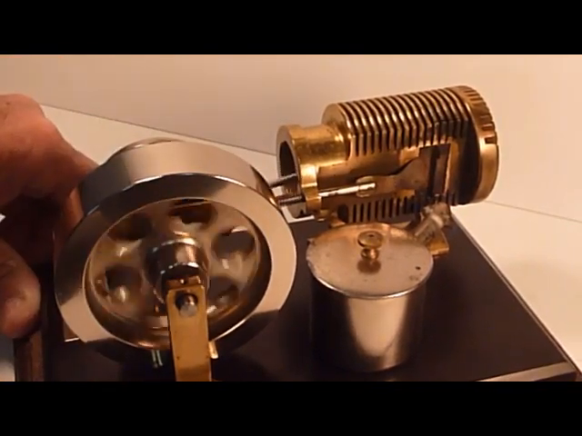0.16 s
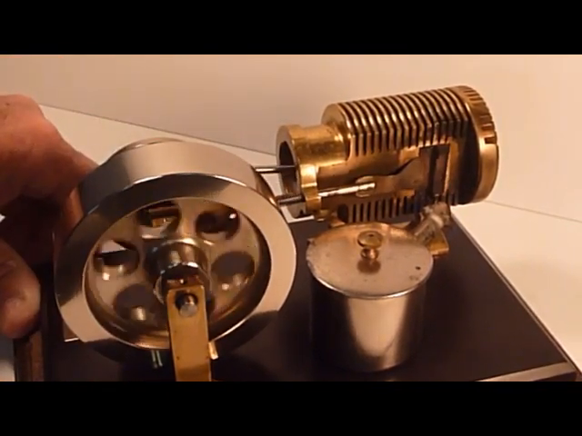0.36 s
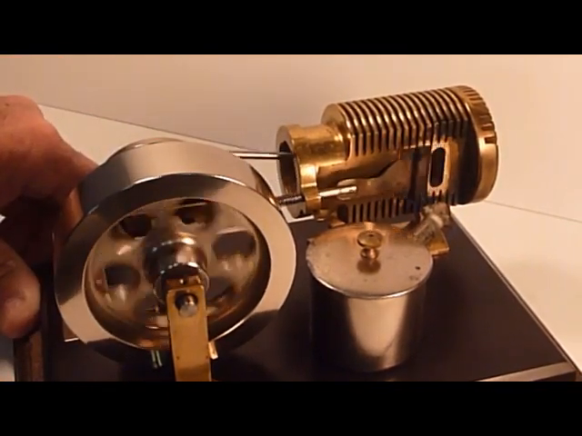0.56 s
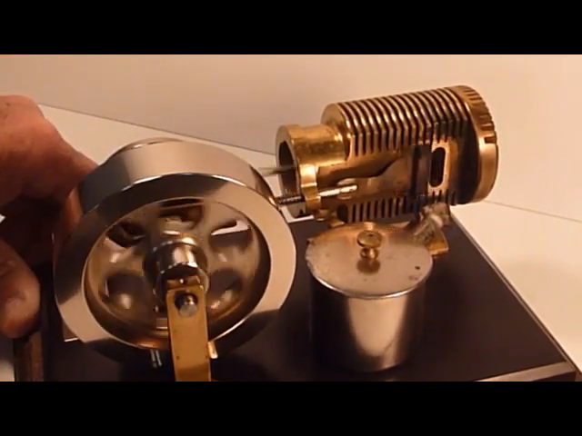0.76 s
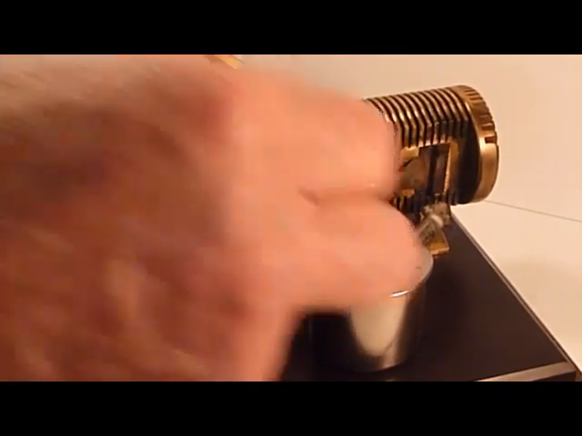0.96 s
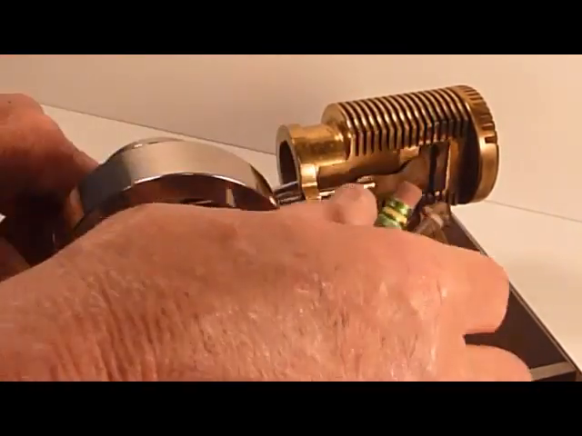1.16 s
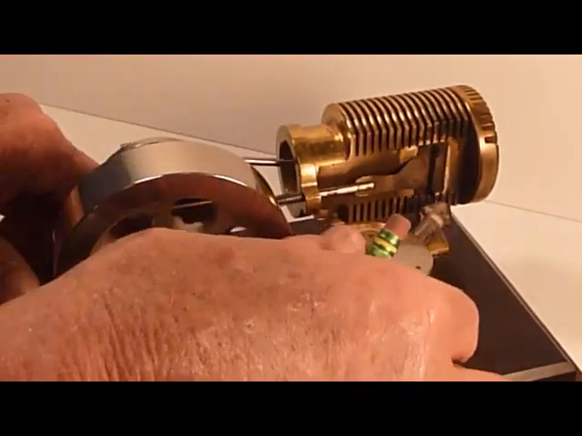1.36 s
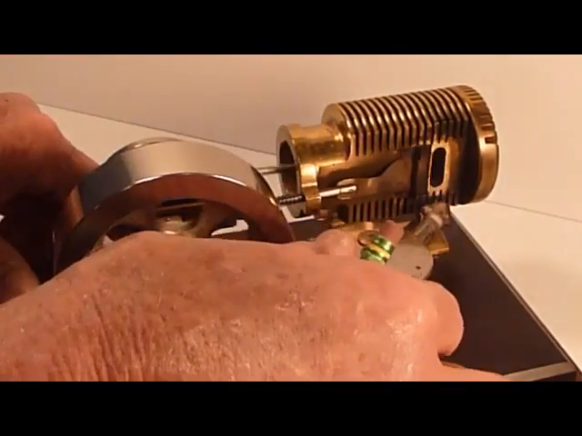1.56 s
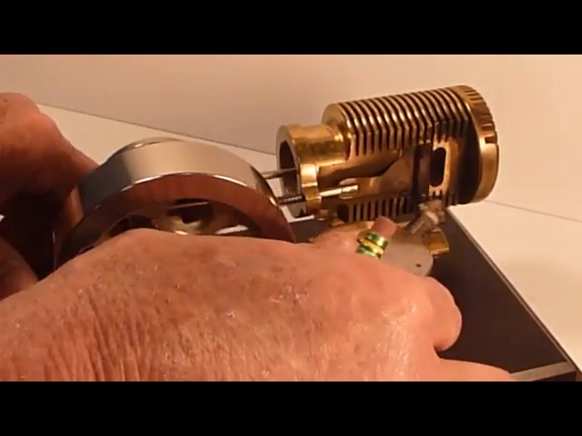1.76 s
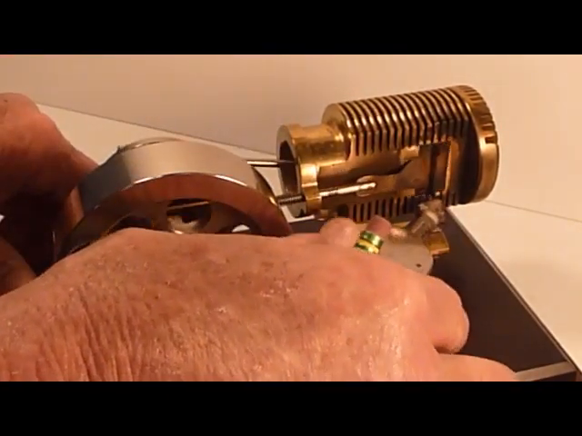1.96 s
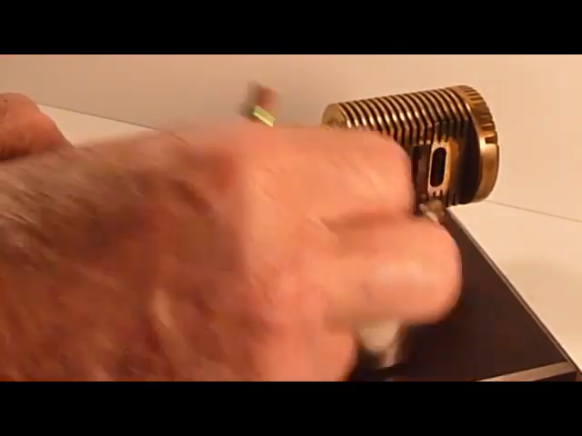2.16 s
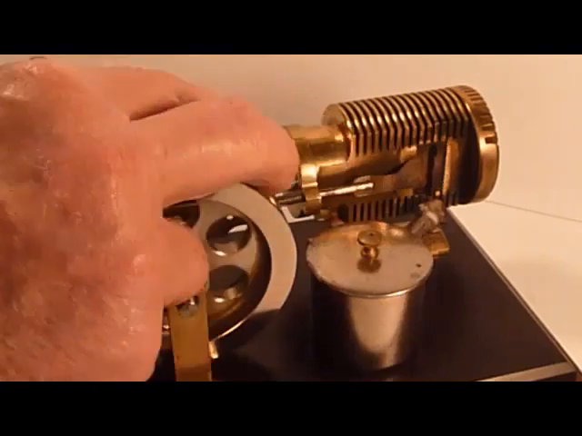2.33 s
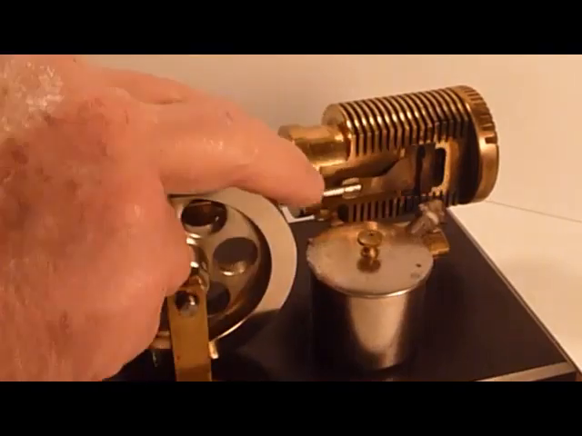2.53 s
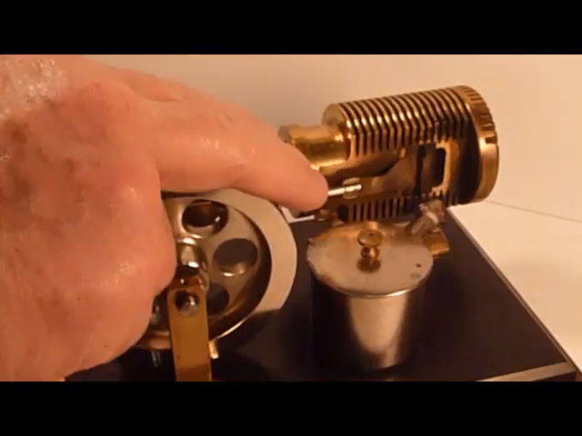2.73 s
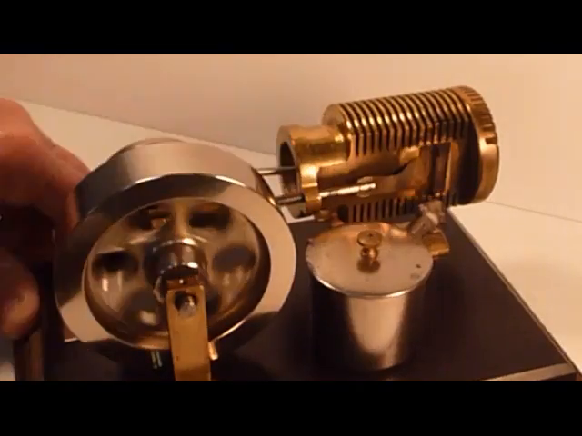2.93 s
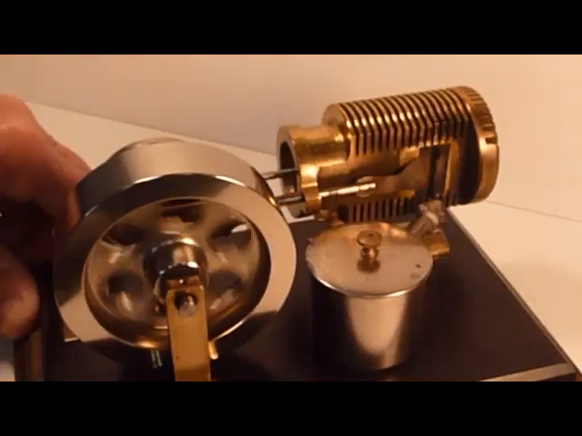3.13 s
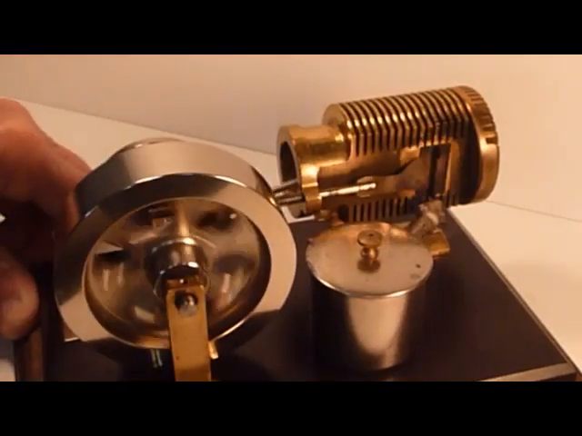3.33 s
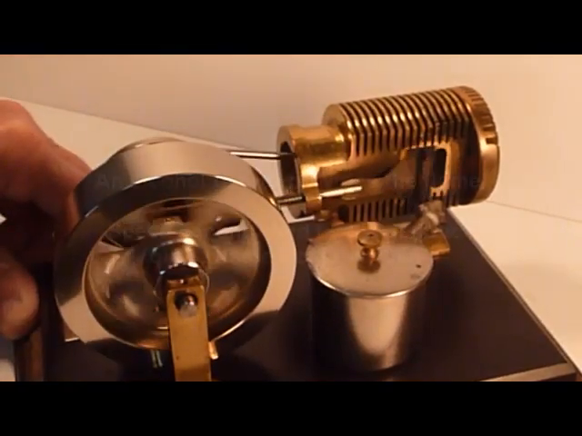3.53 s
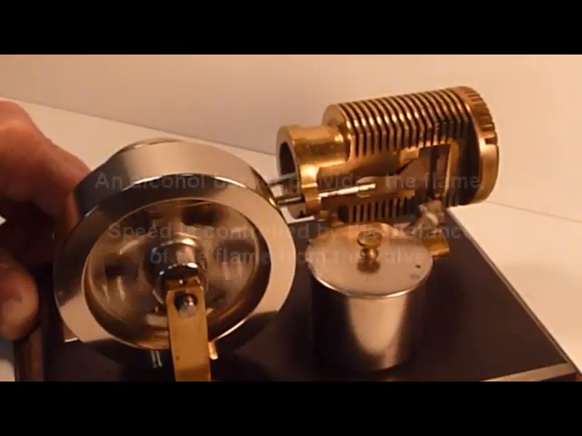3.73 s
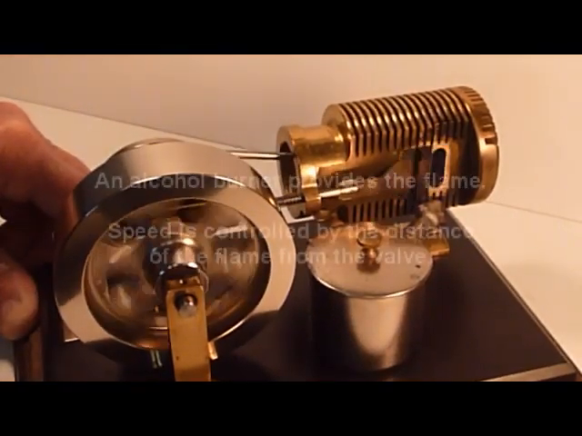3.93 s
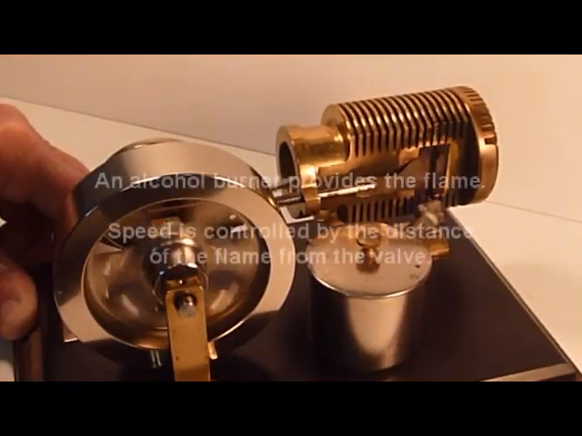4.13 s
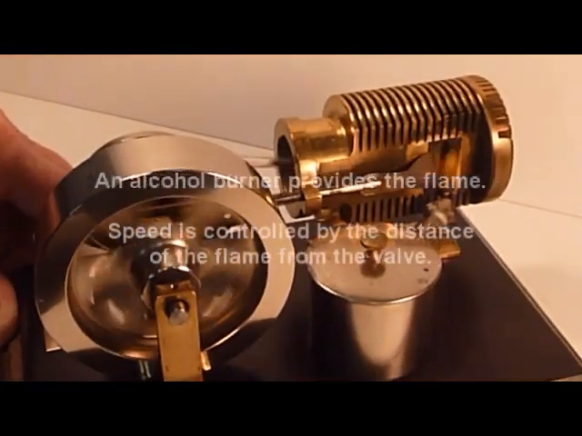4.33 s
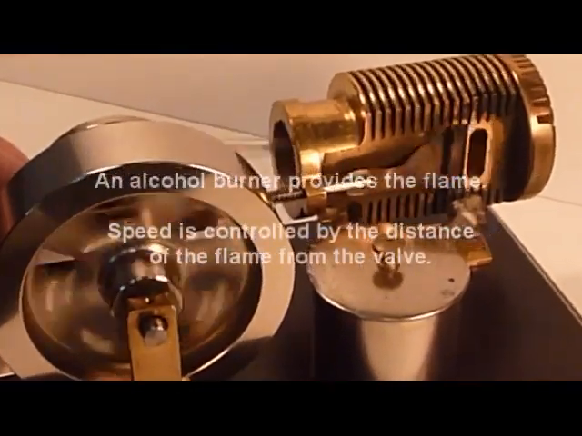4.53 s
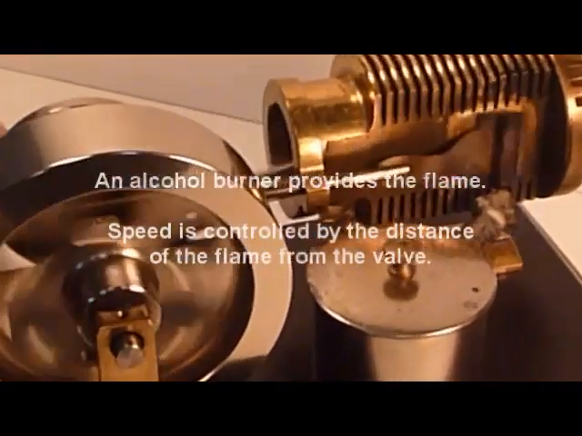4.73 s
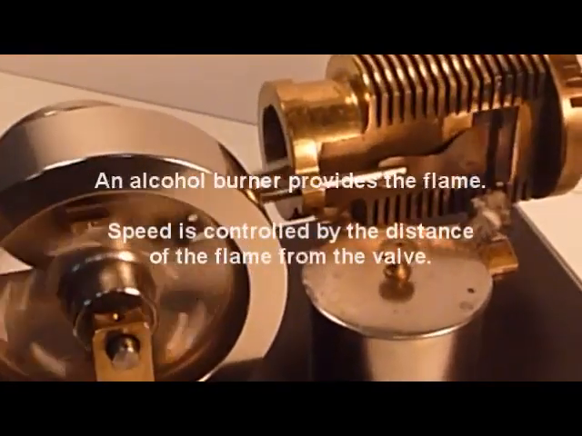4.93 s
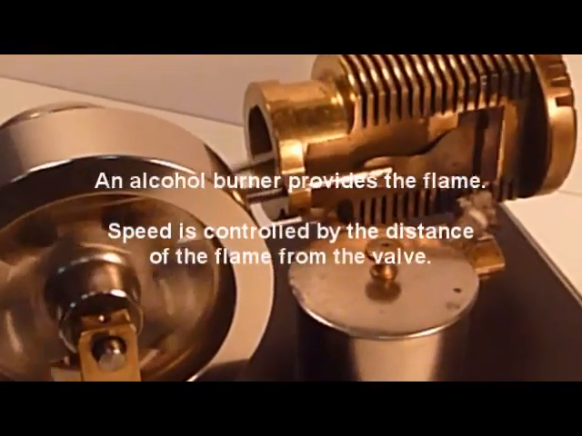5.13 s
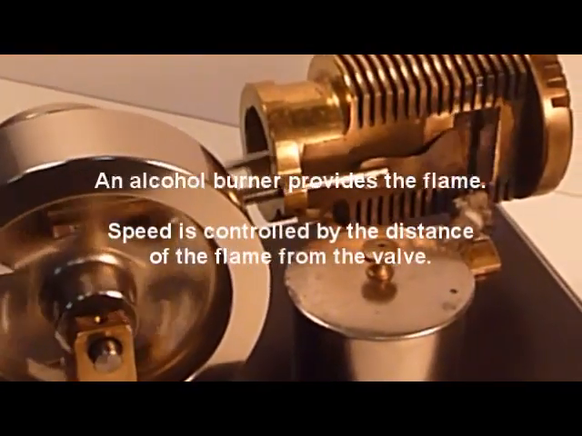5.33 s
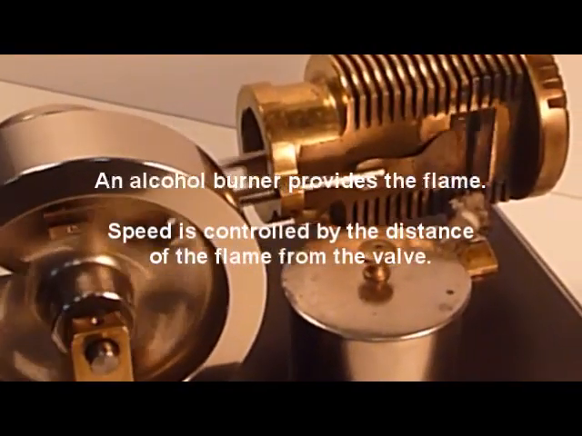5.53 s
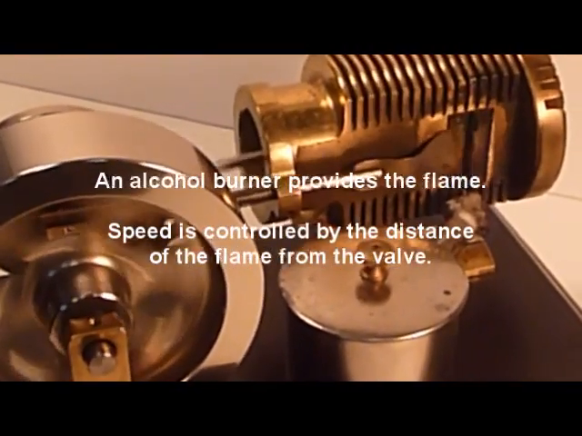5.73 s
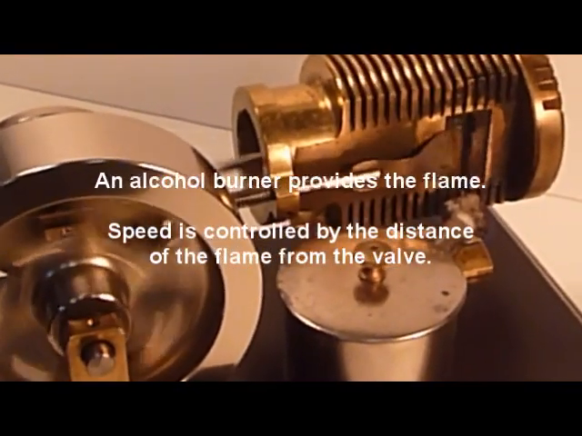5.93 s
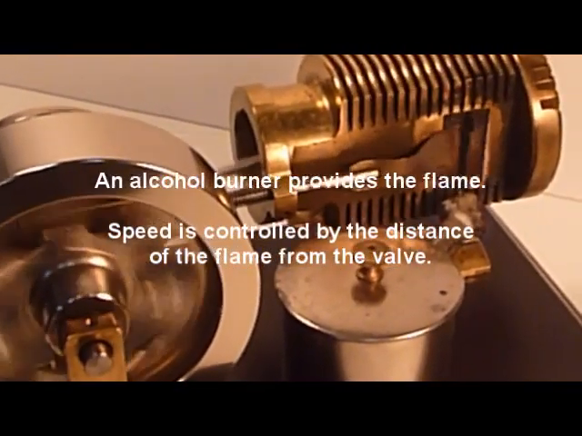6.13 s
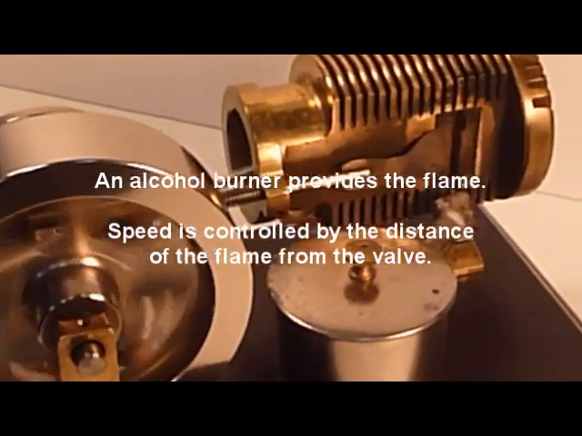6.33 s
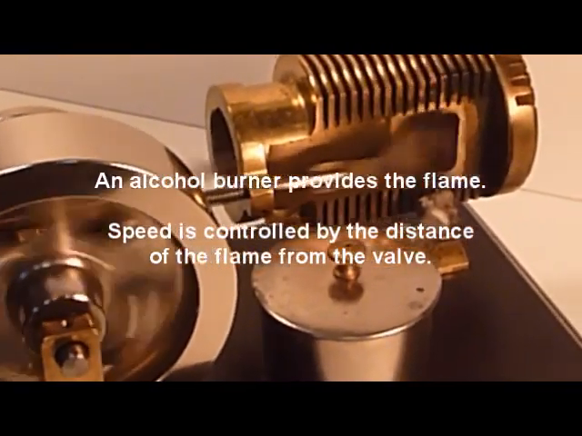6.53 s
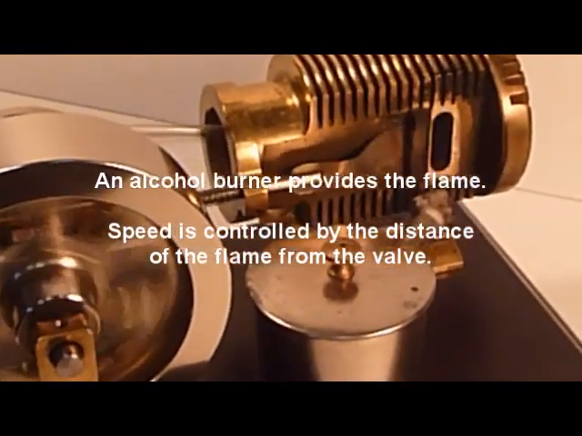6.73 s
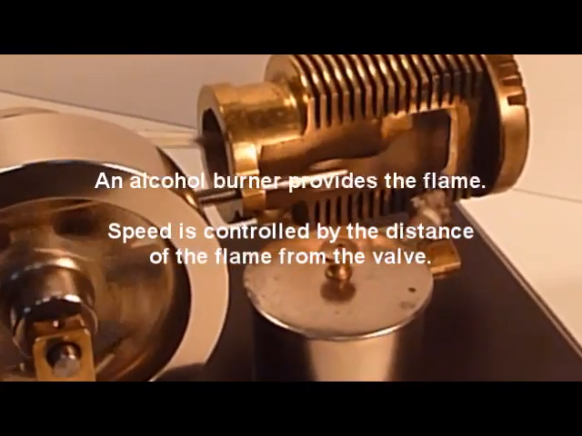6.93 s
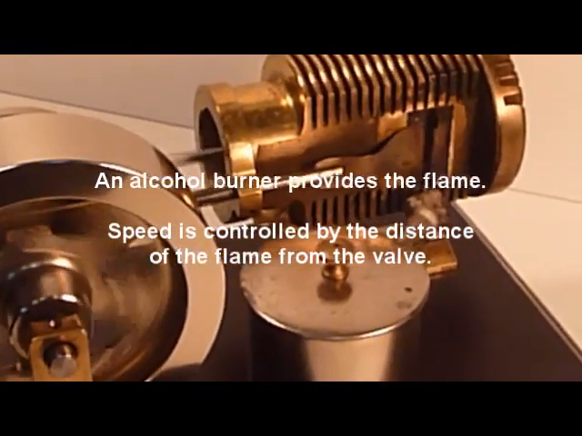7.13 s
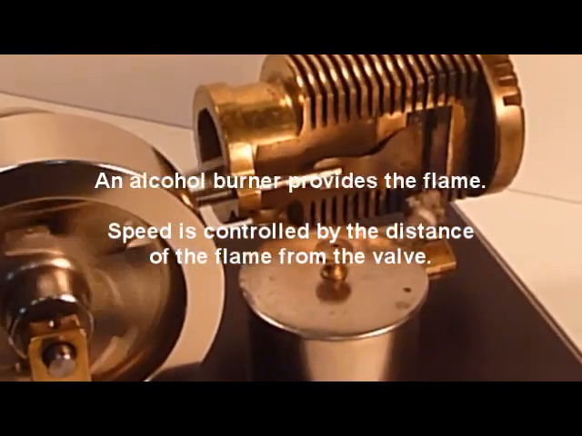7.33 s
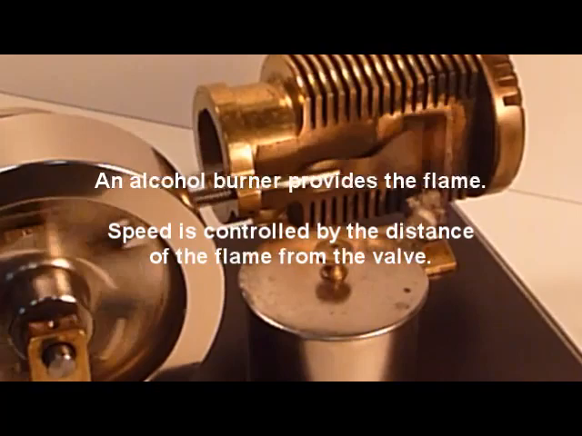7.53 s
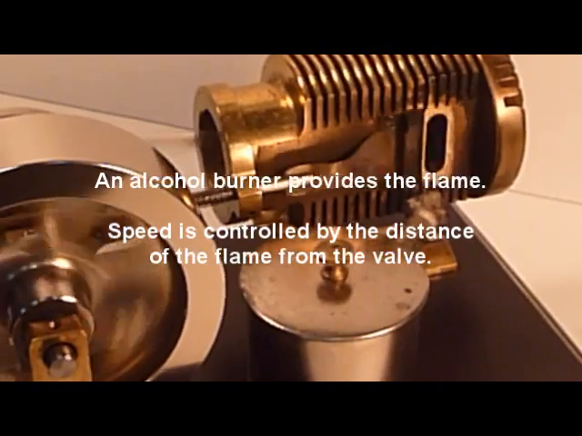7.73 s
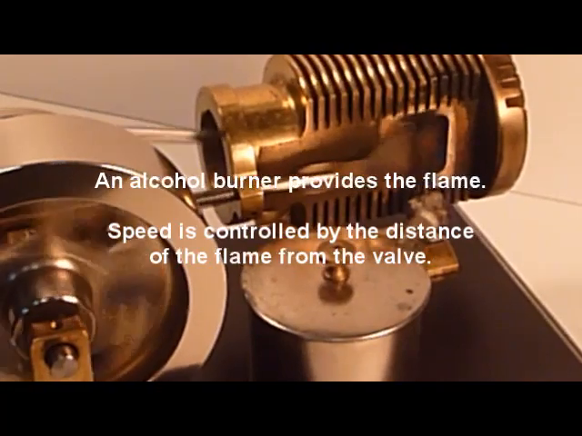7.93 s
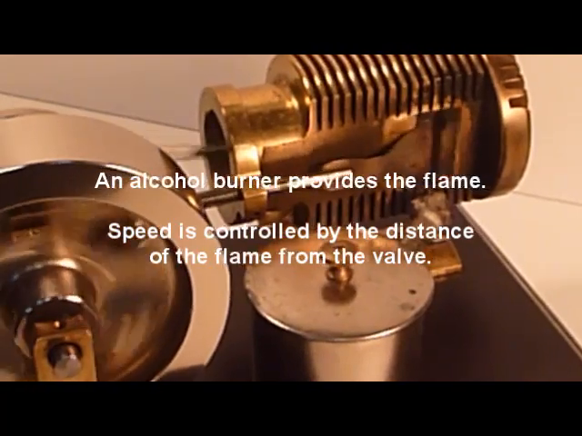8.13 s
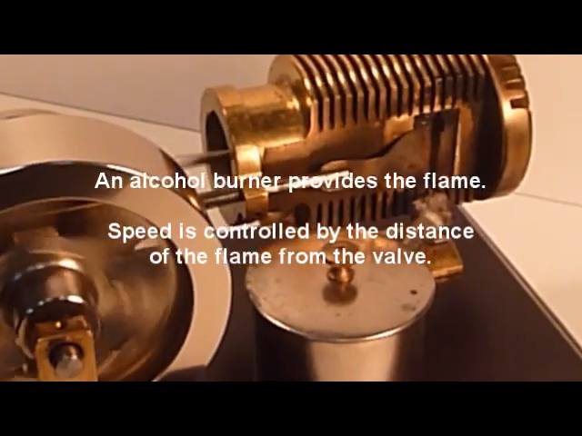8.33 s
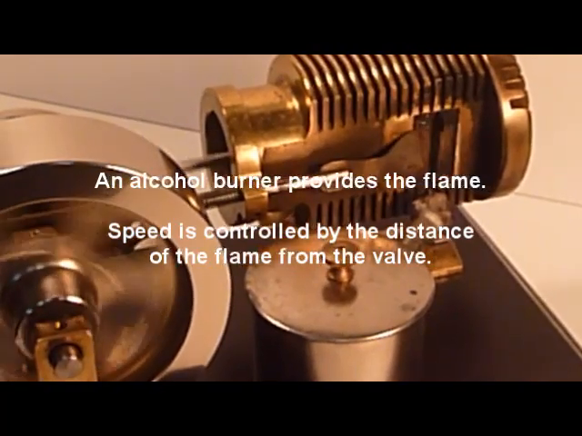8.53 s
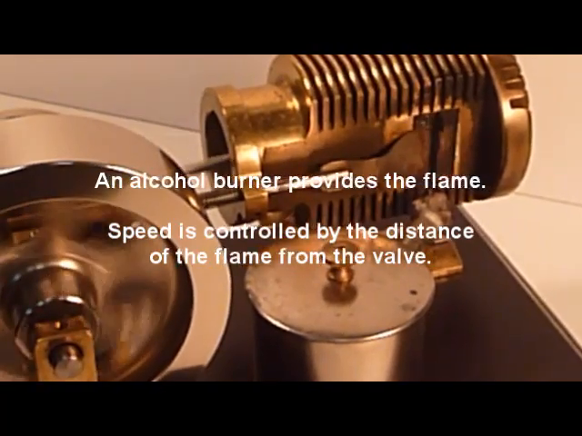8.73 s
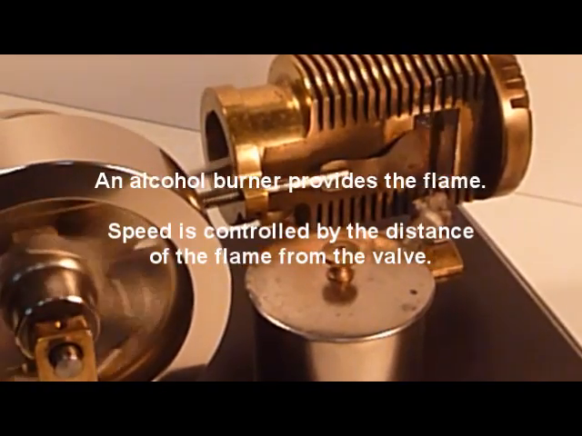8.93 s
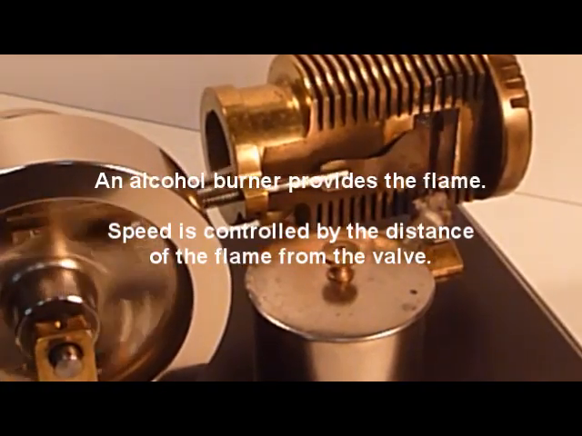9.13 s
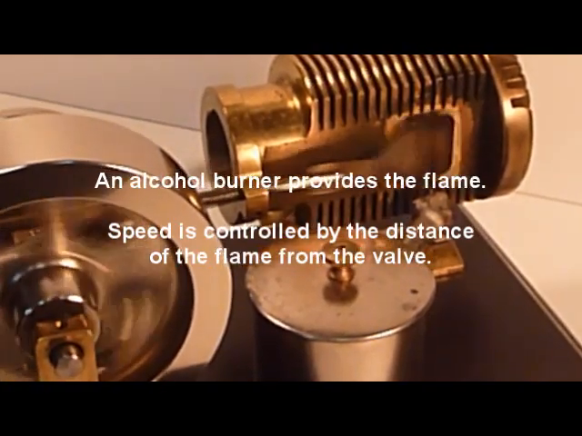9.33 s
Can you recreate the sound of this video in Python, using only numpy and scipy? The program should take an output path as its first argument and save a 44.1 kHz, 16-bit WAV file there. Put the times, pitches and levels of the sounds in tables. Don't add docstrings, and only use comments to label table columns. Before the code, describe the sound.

Dull wooden thuds and metal ticks beside a brass model engine, a couple of starting pops, then fast regular clacking pops with chirpy valve ticks.

```python
import sys
import numpy as np
from scipy import signal
from scipy.fft import rfft, irfft, next_fast_len
from scipy.io import wavfile
from scipy.ndimage import map_coordinates

SR = 44100
rng = np.random.default_rng(int(sys.argv[2]) if len(sys.argv) > 2 else 0)


def volts_from_db(level):
    exponent = np.asarray(level, float) / 20
    return 10 ** exponent


def wav_record(signal):
    frames = np.transpose(np.atleast_2d(signal))
    bounded = np.clip(frames, -1, 1)
    quanta = np.round(bounded * 32767).astype(np.int16)
    wavfile.write(sys.argv[1], SR, quanta)


N = 418068

# time in seconds, speed in turns per second.
FLYWHEEL_SPEED = [(3.47, 6.736), (3.65, 7.556), (3.8, 7.156), (4.2, 7.872), (5.05, 9.51), (5.7, 9.953),
                  (5.9, 9.965), (6.55, 10.855), (7.6, 10.994), (8.1, 10.844), (8.5, 10.244), (9.05, 10.292),
                  (9.48, 11.077)]
FIRST_POP_S = 3.4722

# start in seconds, peak in dB, crack in dB, lean of the port modes in dB per 100
# Hz.
HAND_POPS = [
    (0.326, -1, -25.5, -2),
    (3.138, -3, -25.5, -3.05),
    (3.318, -1, -22.5, 0.65),
]
POP_DB, POP_DB_PER_S, POP_SCATTER_DB = -.8, -.65, .7
CRACK_DB, CRACK_DB_PER_S, CRACK_SCATTER_DB = -20.5, -2, 2.5
LEAN, LEAN_SCATTER = 0.14, .03

# pitch in Hz, level in dB, decay t60 in seconds, polarity, left over right in dB.
BODY_MODES = [(250, -11, .018, -1, 0), (396, -21, .036, 1, 1), (486, -19, .042, 1, -2),
              (672, -6, .022, 1, 0), (800, -19, .03, 1, 0), (1003, -23, .021, -1, -9),
              (1163, -14, .025, 1, 0), (1311, -15, .026, 1, -4), (1460, -17, .033, 1, -5),
              (1730, -18, .03, 1, -7), (1886, -6, .019, -1, -4), (2125, -14, .021, 1, -6),
              (2303, -20, .024, 1, 1), (2498, -30, .038, -1, -6), (2764, -24, .02, -1, 1)]
# time in seconds, port ring in Hz, top of the whistle in Hz, cylinder level in dB.
PORT_OPENING = [(.33, 1867, 2100, -17), (3.14, 2035, 2220, -10), (3.32, 1890, 2590, -7),
                (3.8, 1902, 2453, -7), (4.5, 1860, 2770, -4), (5.5, 1891, 2922, -1), (9.48, 1848, 3000, -1)]
# share of the whistle top, level in dB.
RUSH_TONE = [(.15, -21), (.28, -8), (.4, -6), (.62, 3.5), (.86, 8), (.97, 0.5), (1.1, -39)]
# share of the whistle top, level in dB.
STROKE_TONE = [(.12, -21.5), (.25, -10), (.4, -13), (.6, -6), (.75, 2.5), (.92, 5), (.99, -5),
               (1.08, -32.5)]
# frequency in Hz, level in dB.
CRACK_TONE = [(2500, -37), (3050, -4), (3500, 5), (4500, -4.5), (6500, -17), (8000, -31), (9500, -25),
              (16000, -41.5)]
# frequency in Hz, level in dB.
SNAP_TONE = [(6000, -30.5), (8000, -8.5), (10000, 0), (13000, -2), (16000, 4)]
SNAP_DB, SNAP_SCATTER_DB = -34, 4
# frequency in Hz, level in dB.
CONTACT_TONE = [(1500, -1.5), (2500, 1), (5000, 3), (7000, -3.5), (8000, -15), (9500, -0.5), (11000, -15),
                (13000, -32.5)]
TABLE_HZ, TABLE_WIDTH_HZ, TABLE_DEPTH = 930, 110, .8

# pitch in Hz, level in dB, decay t60 in seconds.
VALVE_MODES = [(3320, -6, .045), (3390, -5.5, .055), (3460, -5.5, .05), (3560, -4, .02), (3200, -6, .014),
               (4250, -14, .02), (5800, -20, .012), (9050, -20, .012)]
# time in seconds, pitch ratio.
VALVE_TIGHTNESS = [(3.5, 0.91), (4.6, 0.95), (5.2, 1), (9.48, 1.01)]
# time in seconds, level in dB.
SEATING_LEVEL = [(3.55, -31), (3.82, -32.5), (4.2, -25), (4.6, -23.5), (5.15, -19.5), (5.55, -20),
                 (5.8, -26), (6.05, -22.5), (6.5, -21.5), (7.2, -24), (7.65, -28), (7.9, -25.5), (8.2, -30),
                 (8.5, -27), (8.85, -36), (9.45, -27.5)]
SHUT_S, SHUT_TURN = .0283, .33
SEAT_SCATTER_DB, RASP_DB, RASP_FOLLOWS, RASP_SCATTER_DB = 1.1, -22, .7, 2.5

# start in seconds, thud in dB, cup ring in dB, tick in dB.
PENCIL_TAPS = [
    (0.655, -2.5, -18.5, -33.5),
    (1.111, -4, -18, -22),
    (1.587, -3, -20.5, -22.5),
    (2.138, -8, -22.5, -22),
]
# start in seconds, thud in dB, ring in dB, tick in dB.
FINGER_BUMPS = [
    (2.802, -24, -43, -45),
    (2.966, -15, -37, -45),
    (3.021, -15, -45, -45),
    (3.034, -14.5, -45, -45),
    (3.069, -17, -43, -42),
]
# start in seconds, thud in dB, foot ring in dB, tick in dB.
BURNER_LANDINGS = [
    (0.012, -32.5, -2.5, -10),
    (0.848, -17.5, -14.5, -14.5),
    (1.319, -18, -10.5, -11),
    (1.832, -16, -12, -22.5),
    (2.461, -19, -19, -31.5),
]
# pitch in Hz, level in dB, decay t60 in seconds.
BASE_MODES = [(141, -15.5, 0.088), (213.6, 0.5, 0.033), (279, 5.5, 0.022), (481, -5, 0.042)]
# pitch in Hz, level in dB, decay t60 in seconds.
CUP_MODES = [(800, -12, .025), (1110, -2, .04), (1240, 0, .045), (2400, -9, .02)]
# pitch in Hz, level in dB, decay t60 in seconds.
FOOT_MODES = [(780, -16, .015), (1130, -7, .03), (1600, 0, .025), (2260, -7, .02)]
LOOSE_DB = 1.5

# time in seconds, level in dB.
RUB_LEVEL = [(0.0, -74), (0.23, -59.5), (0.376, -57), (0.56, -53), (0.704, -55.5), (0.78, -53.5),
             (0.93, -58), (1.05, -74)]
# pitch in Hz, width in Hz, level in dB.
BRASS_PEAKS = [(1790, 360, -1.5), (1868, 60, 3.5), (2673, 84, 7), (3550, 100, -10), (4500, 160, -12),
               (5090, 88, -11), (6270, 280, -10.5), (6500, 73, -17), (7400, 99, -30), (8560, 130, -35),
               (9700, 500, -27.5), (10900, 100, -50)]
# time in seconds, level in dB.
WHIRR_LEVEL = [(3.14, -68), (3.37, -52), (4.02, -58), (4.39, -51), (5.6, -52.5), (6.7, -53), (7.4, -56.5),
               (9.48, -57.5)]
# time in seconds, level in dB.
SPIN_LEVEL = [(2.9, -75), (2.924, -66), (3.002, -53.5), (3.048, -58.5), (3.088, -49), (3.122, -62),
              (3.14, -38)]
# frequency in Hz, level in dB.
WHIRR_TONE = [(300, -6), (1000, -1.5), (2500, 4.5), (4000, 0.5), (6500, -13), (7600, -11), (9500, -14.5),
              (11000, -25.5), (16000, -63)]

# time in seconds, level in dB.
FLOOR_LEVEL = [(0.0, -63), (0.18, -50), (0.58, -47), (2.93, -47.5), (4.65, -45), (5.86, -47), (7.29, -51.5),
               (7.7, -51), (9, -52), (9.48, -55.5)]
# frequency in Hz, level in dB per Hz.
FLOOR_TONE = [(15, -63.5), (25, -26), (110, -14), (146, -13), (194, -8), (240, -12), (277, -11.5),
              (344, -12.5), (567, -18), (773, -20.5), (1000, -28), (1440, -27.5), (1540, -32), (3380, -36),
              (7430, -52.5), (8300, -84), (9660, -68), (16300, -120)]
# pitch in Hz, width in Hz, rise over the floor in dB.
APPLIANCE_HUM = [(118, 5, 12), (210, 20, 6), (274, 7, 13), (484, 15, 5)]
# frequency in Hz, left-right likeness.
FLOOR_LIKENESS = [(60, 0.99), (160, 1.0), (400, 0.98), (1040, 0.78), (2700, 0.52), (6980, 0.17)]
# frequency in Hz, t60 in seconds.
ROOM_DECAY = [(200, 1), (700, 0.56), (2000, 0.46), (4000, 0.13), (10000, 0.23)]
# frequency in Hz, left-right likeness.
ROOM_LIKENESS = [(300, .99), (1000, 0.94), (2000, 0.5), (5000, 0.15)]
# frequency in Hz, level in dB.
MIC_TONE = [(7000, -1.5), (7700, -17), (10300, -12.5), (11500, -27.5), (16000, -45)]


def along(points, hz):
    f, value = np.transpose(points)
    return np.interp(np.log(hz + 1), np.log(f + 1), value)


def curve(rows):
    s, db = np.transpose(rows)
    return volts_from_db(np.interp(np.arange(N) / SR, s, db, left=-120, right=-120))


def unit(x):
    return x / np.sqrt(np.mean(x ** 2) + 1e-20)


def filtered(x, response):
    m = next_fast_len(x.shape[-1] + 4096)
    spectrum = rfft(x, m) * response(np.fft.rfftfreq(m, 1 / SR))
    return irfft(spectrum, m)[..., :x.shape[-1]]


def paired(ab, alike):
    def mid_side(hz):
        angle = np.arccos(np.clip(along(alike, hz), -1, 1)) / 2
        return np.array([np.cos(angle), np.sin(angle)])

    mid, side = filtered(ab, mid_side)
    return np.array([mid + side, mid - side])


def wobble(rate):
    knots = rng.standard_normal(int(N * rate / SR) + 4)
    return map_coordinates(knots, [np.arange(N) * rate / SR])


def swell(t, rise_s):
    return 1 - np.exp(-t / rise_s)


def ring(modes, t, scatter_db):
    total = 0
    for hz, db, t60 in modes:
        level = db + rng.normal(0, scatter_db)
        total = total + volts_from_db(level - 60 * t / t60) * np.sin(2 * np.pi * hz * t)
    return total


def click(t, t60, tone, width=0.36):
    mid, side = rng.standard_normal((2, len(t))) * volts_from_db(-60 * t / t60)
    both = np.array([mid + width * side, mid - width * side])
    burst = filtered(both, lambda hz: volts_from_db(along(tone, hz)))
    return burst / np.abs(burst).max()


def add(track, s, sound):
    k = max(round(s * SR), 0)
    track[:, k:k + sound.shape[-1]] += sound


def turns():
    t = np.arange(FIRST_POP_S, N / SR + 1, 1 / SR)
    angle = np.cumsum(np.interp(t, *np.transpose(FLYWHEEL_SPEED))) / SR
    s = np.interp(np.arange(int(angle[-1])), angle, t)
    inside = s[:-1] < N / SR
    return s[:-1][inside], np.diff(s)[inside]


def running_pops():
    s, _ = turns()
    age = s - s[0]
    luck = rng.standard_normal((3, len(s)))
    peak_db = POP_DB + POP_DB_PER_S * age + POP_SCATTER_DB * luck[0]
    crack_db = CRACK_DB + CRACK_DB_PER_S * age + CRACK_SCATTER_DB * luck[1]
    return list(zip(s, peak_db, crack_db, LEAN + LEAN_SCATTER * luck[2]))


def struck_body(t, lean, ring_hz, cylinder_db):
    hz, mode_db, t60, polarity, pan_db = np.transpose(BODY_MODES)[:, :, None]
    late = np.maximum(t - .00039 * (hz > 900), 0)
    port = hz > 1600
    pitch = hz * np.where(port, ring_hz / 1886, 1) * (1 + rng.normal(0, .006, hz.shape))
    level = mode_db + np.where(port, lean * (hz - 1886) / 100, cylinder_db * (hz > 900))
    level = level + rng.normal(0, 0.89, hz.shape)
    modes = polarity * volts_from_db(level - 60 * late / t60) * np.sin(2 * np.pi * pitch * late)
    both = np.array([(modes * volts_from_db(pan_db / 2)).sum(0), (modes * volts_from_db(-pan_db / 2)).sum(0)])
    puff = np.hanning(9) / 4
    return signal.fftconvolve(both, puff[None], axes=1)


def port_whistle(t, top_hz):
    rising_hz = top_hz * (1 - 0.3356 * np.exp(-t / rng.normal(0.00617, 0.0011)))
    tone = np.sin(2 * np.pi * np.cumsum(rising_hz) / SR)
    return tone * swell(t, 0.00087) * volts_from_db(-60 * t / 0.027) * volts_from_db([[-1.5], [1.5]])


def table_echo(hz):
    band = 1j * hz * TABLE_WIDTH_HZ
    return 1 - TABLE_DEPTH * band / (TABLE_HZ ** 2 - hz * hz + band)


def pops():
    track = np.zeros((2, N + SR))
    t, stroke = np.arange(2600) / SR, np.arange(7500) / SR
    port_s, port_ring, port_top, port_cylinder = np.transpose(PORT_OPENING)
    for s, db, crack_db, lean in [*HAND_POPS, *running_pops()]:
        ring_hz = np.interp(s, port_s, port_ring)
        top_hz = np.interp(s, port_s, port_top)
        cylinder_db = np.interp(s, port_s, port_cylinder)

        scrape = click(t, 0.058, CRACK_TONE)
        add(track, s - .005, volts_from_db(db + crack_db - 7.5) * scrape)
        add(track, s + .0005, volts_from_db(db + 9) * struck_body(t, lean, ring_hz, cylinder_db))
        crack = click(t, 0.017, CRACK_TONE) * swell(t, .0004) * volts_from_db([[-.8], [.8]])
        add(track, s + 0.00081, volts_from_db(db + crack_db + 18) * crack)
        snap = click(t, .008, SNAP_TONE)
        add(track, s + .0012, volts_from_db(SNAP_DB + rng.normal(0, SNAP_SCATTER_DB)) * snap)

        add(track, s + 0.002003, volts_from_db(db - 2.0 + rng.normal(0, 1.6)) * port_whistle(t, top_hz))
        rush = click(t, 0.046, np.multiply(RUSH_TONE, [top_hz, 1])) * swell(t, 0.0031)
        add(track, s + 0.0039, volts_from_db(db - 2.0) * rush)
        flow = click(stroke, 0.88, np.multiply(STROKE_TONE, [top_hz, 1]), width=0.82)
        add(track, s + 0.0071, volts_from_db(db - 26.5 - .4 * cylinder_db) * flow)

        cam_db = -20.5 + .8 * cylinder_db + rng.normal(0, 0.9)
        add(track, s + .0155 + rng.normal(0, .0007), volts_from_db(cam_db) * click(t, 0.034, CONTACT_TONE))
    return filtered(track[:, :N], table_echo)


def shuttings():
    s, length = turns()
    s = (s + SHUT_S + SHUT_TURN * length)[:-1]
    seat_db = np.interp(s, *np.transpose(SEATING_LEVEL))
    luck = rng.standard_normal((2, len(s)))
    rasp_db = RASP_DB + RASP_FOLLOWS * seat_db + RASP_SCATTER_DB * luck[1]
    return zip(s, seat_db + SEAT_SCATTER_DB * luck[0], rasp_db)


def ticks():
    track, t = np.zeros((2, N + SR)), np.arange(3500) / SR
    soft = swell(t, .0009)
    for s, db, rasp_db in shuttings():
        tight = np.interp(s, *np.transpose(VALVE_TIGHTNESS)) * (1 + rng.normal(0, .008))
        modes = [(hz * tight, level, t60) for hz, level, t60 in VALVE_MODES]
        chirp = soft * ring(modes, t, scatter_db=0.04) * volts_from_db([[-1.2], [1.2]])
        add(track, s - .0004, volts_from_db(db + 9.5) * chirp)
        add(track, s - .0004, volts_from_db(rasp_db + 25) * soft * click(t, 0.015, CRACK_TONE))
    return track[:, :N]


def touches(events, metal, soft_s):
    track, t = np.zeros((2, N + SR)), np.arange(4000) / SR
    for s, db, ring_db, tick_db in events:
        thud = ring(BASE_MODES, t, LOOSE_DB) * swell(t, soft_s)
        add(track, s, volts_from_db(db + 2) * thud[None])
        add(track, s + soft_s, -volts_from_db(db + ring_db + 7.5) * ring(metal, t, LOOSE_DB)[None])
        tick = click(t, 0.022, CONTACT_TONE) * swell(t, .0006)
        add(track, s + 0.00039, volts_from_db(db + tick_db + 12.5) * tick)
    return track[:, :N]


def taps():
    soft = touches([*PENCIL_TAPS, *FINGER_BUMPS], CUP_MODES, soft_s=.003)
    hard = touches(BURNER_LANDINGS, FOOT_MODES, soft_s=.0006)
    return soft + hard


def brass_song(hz):
    hiss = volts_from_db(-16.5) * (hz > 1200) / (1 + (hz / 6000) ** 6)
    peaks = sum(volts_from_db(db + 14 * (c > 7000)) / (1 + (2 * (hz - c) / w) ** 2) for c, w, db in BRASS_PEAKS)
    return peaks + hiss


def friction():
    slips = volts_from_db(2 * np.array([wobble(60), wobble(200)]))[:, None]
    slow, fast = rng.standard_normal((2, 2, N)) * slips
    rub = unit(filtered(paired(slow, ROOM_LIKENESS), brass_song)) * curve(RUB_LEVEL) * volts_from_db(14)
    whirr = unit(filtered(paired(fast, ROOM_LIKENESS), lambda hz: volts_from_db(along(WHIRR_TONE, hz))))
    return rub + whirr * (curve(WHIRR_LEVEL) + curve(SPIN_LEVEL)) * volts_from_db(10 + 0.75 * wobble(14))


def room(x):
    drift, wet = wobble(1.498), 0
    for share in np.cos(drift), np.sin(drift):
        hz, t, z = signal.stft(rng.standard_normal((2, SR // 2)), SR, nperseg=256)
        decay = volts_from_db(-60 * t / along(ROOM_DECAY, hz)[:, None])
        tail = paired(signal.istft(z * decay, SR, nperseg=256)[1], ROOM_LIKENESS)
        tail = tail * (1 + 3.48 * np.exp(-np.arange(tail.shape[1]) / SR / 0.0078))
        tail = np.pad(tail, ((0, 0), (250, 0))) / np.linalg.norm(tail[0])
        send = x.mean(0) * np.resize(share, x.shape[1])
        wet = wet + signal.fftconvolve(send[None], tail, axes=1)
    return wet


def floor():
    def tone(hz):
        humps = sum(db / (1 + ((hz - c) / w) ** 2) for c, w, db in APPLIANCE_HUM)
        return volts_from_db(along(FLOOR_TONE, hz) + humps)

    noise = filtered(paired(rng.standard_normal((2, N)), FLOOR_LIKENESS), tone)
    return unit(noise) * curve(FLOOR_LEVEL) * volts_from_db(16.5 + 0.86 * wobble(4)) * volts_from_db([[-.3], [.3]])


def scene():
    engine = pops() + ticks() + taps()
    before = round(.36 * SR)
    wet = room(np.concatenate([engine[:, :before], engine], 1))[:, before:before + N]
    return engine + volts_from_db(-10.5) * wet + friction() + floor()


def low_pass(x):
    return signal.sosfilt(signal.butter(12, 20000, fs=SR, output="sos"), x)


def record(dry):
    heard = filtered(dry, lambda hz: volts_from_db(along(MIC_TONE, hz)))
    keep = np.exp(-1 / (SR * .08))
    delayed = np.pad(heard.mean(0) ** 2, (130, 0))[:N]
    power = signal.lfilter([1 - keep], [1, -keep], delayed)
    ducked = heard * (1 + power / volts_from_db(-49.5)) ** -.3
    lean_bass = signal.lfilter(*signal.butter(2, 75 / SR * 2, "high"), ducked)
    clipped = lean_bass / (1 + np.abs(lean_bass) ** 12) ** (1 / 12)
    return low_pass(clipped)


dry = scene()
out = record(dry)
wav_record(out)
```